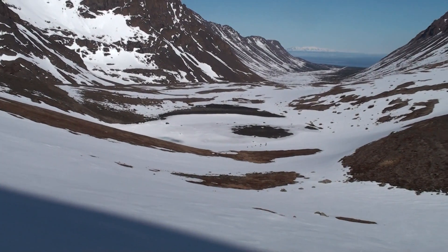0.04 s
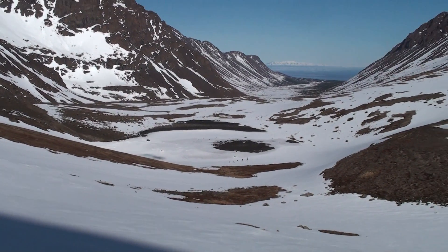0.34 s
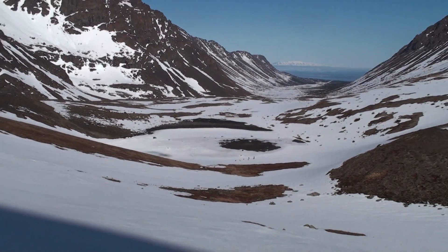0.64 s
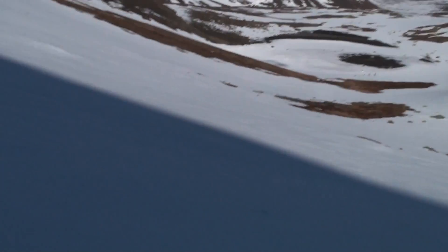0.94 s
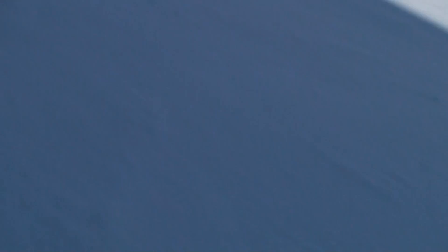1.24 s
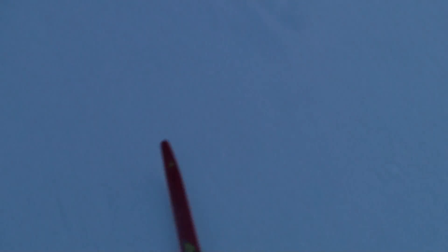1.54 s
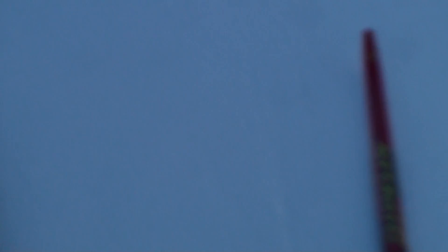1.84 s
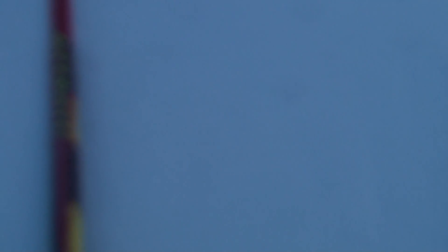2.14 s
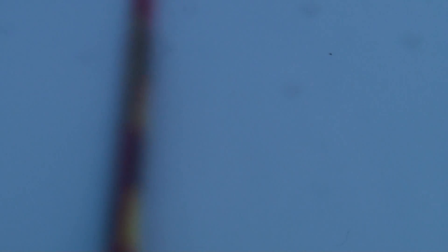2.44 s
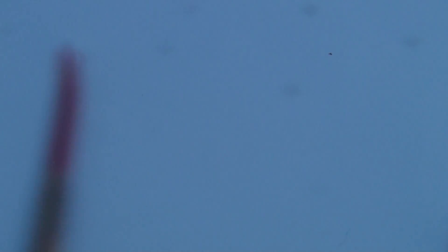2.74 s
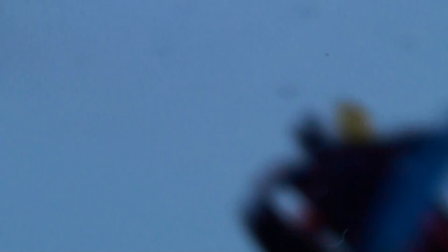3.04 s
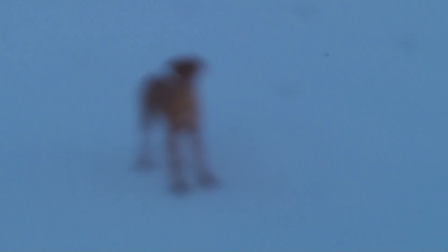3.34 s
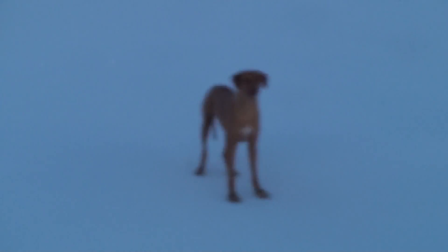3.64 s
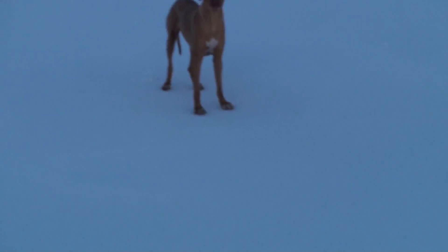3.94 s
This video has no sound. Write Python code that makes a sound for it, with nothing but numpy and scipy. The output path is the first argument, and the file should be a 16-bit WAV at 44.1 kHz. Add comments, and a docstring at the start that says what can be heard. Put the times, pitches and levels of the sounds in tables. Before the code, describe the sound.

Skis scrape and crunch on crusty snow, close by in open air with faint hiss. For the first 2 seconds, low wind buffets the microphone, fading as poles and bindings click. From 2.4 seconds a gritty scrape builds, peaking near 2.9, with sharp cracks, small knocks and a tiny squeak. A pole ticks at 3.5 seconds, then a second crunching stroke swells until about 4 seconds.

```python
"""A skier shuffles on crusty snow in open air, close to a hand-held camera: no echo, only a faint hiss.
For two seconds wind buffets the microphone ports; as it drops, pole and binding click.
From 2.4 s a ski scrapes up dense ice grains; the crust snaps in short cracks and gives way in longer
crunches, while the skis knock and packed snow squeaks. A pole ticks at 3.5 s,
and a second stroke builds through the last half second."""
import sys
import numpy as np
from scipy import signal
from scipy.fft import rfft, irfft, next_fast_len
from scipy.io import wavfile
from scipy.ndimage import uniform_filter1d, map_coordinates

SR = 44100
rng = np.random.default_rng(int(sys.argv[2]) if len(sys.argv) > 2 else 0)


def file_out(sig):
    """Save sig as 16-bit WAV at sys.argv[1]."""
    # one column per channel
    cols = np.atleast_2d(sig).T
    # limit, then scale
    lim = np.clip(cols, -1, 1)
    pcm = np.round(lim * 32767).astype(np.int16)
    wavfile.write(sys.argv[1], SR, pcm)


N = 176400


def amp(db):
    """Decibels to gain."""
    return 10 ** (np.asarray(db) / 20)


def unit(x):
    """Scale to rms 1."""
    return x / np.sqrt(np.mean(x ** 2) + 1e-20)


def along(points, hz):
    """Read (Hz, value) points along a log frequency axis."""
    freqs, values = np.transpose(points)
    return np.interp(np.log(hz + 1), np.log(freqs + 1), values)


def curves(rows):
    """A dB value per sample for each column after the time; silent outside."""
    times, *columns = np.transpose(rows)
    return [np.interp(np.arange(N) / SR, times, db, left=-120, right=-120) for db in columns]


def wobble(rate, size=N):
    """A smooth random curve, rate knots a second."""
    knots = rng.standard_normal(size // 16 + 8)
    return map_coordinates(knots, [np.arange(size) * rate / SR], mode="mirror")


def swell(start, length):
    """A rounded rise and fall, timed in seconds."""
    progress = np.clip((np.arange(N) / SR - start) / length, 0, 1)
    return np.sqrt(abs(np.sin(np.pi * progress)))


def coloured(x, gain_db, size=8192):
    """x through a minimum-phase filter whose gain in dB is a function of frequency."""
    cepstrum = irfft(np.log(amp(gain_db(np.fft.rfftfreq(size, 1 / SR)))))
    cepstrum[1:size // 2] *= 2
    cepstrum[size // 2 + 1:] = 0
    kernel = irfft(np.exp(rfft(cepstrum)))[:size // 2]
    padded = next_fast_len(x.shape[-1] + size // 2, True)
    return irfft(rfft(x, padded) * rfft(kernel, padded), padded)[..., :x.shape[-1]]


def rush(spectrum, alike):
    """Left and right noise of rms 1 with a given spectrum and likeness."""
    def noise(sign):
        likeness = lambda hz: np.clip(along(alike, hz), -.99, .99)
        gain_db = lambda hz: along(spectrum, hz) + 10 * np.log10(1 + sign * likeness(hz))
        return coloured(rng.standard_normal(N), gain_db)

    mid, side = noise(1), noise(-1)
    return unit(np.array([mid + side, mid - side]))


def add(track, start, sound):
    """Mix a sound in at start seconds."""
    part = track[:, round(start * SR):][:, :sound.shape[1]]
    part += sound[:, :part.shape[1]]


# Open air all around the microphone. Each row: frequency in Hz, relative level in dB.
AIR_SPECTRUM = [(25, 12), (70, 8.5), (125, 3), (220, -4), (500, 0.5), (1000, -2), (2000, -5.5),
                (4000, -12.5), (7000, -16), (10000, -18.5), (12500, -16.5), (16000, -21.5)]
# Its stereo image. Each row: frequency in Hz, left-right correlation.
AIR_ALIKE = [(60, 0.96), (400, 0.52), (1400, 0.096), (3100, 0.065), (7000, 0.33), (10500, 0.57), (12000, 1)]
AIR_DB = -57.5


def air():
    """The faint, steady hiss of still air."""
    return amp(AIR_DB) * rush(AIR_SPECTRUM, AIR_ALIKE)


def hollow_tone(centre_hz=507, width_hz=68, db=-61.5):
    """A faint, narrow band of noise swells and fades as the wind drops."""
    band = coloured(rng.standard_normal(N), lambda hz: -20 * np.log10(1 + ((hz - centre_hz) / width_hz) ** 2))
    return amp(db) * swell(start=2.095, length=0.51) * unit(band)


# Wind right on the microphone. Each row: time in seconds, buffet and flutter levels in dB before trim.
GUSTS = [(0.0, -39.5, -57.5), (0.09, -42.5, -48.5), (0.31, -42, -59.5), (0.37, -51, -74),
         (0.47, -40, -53.5), (0.68, -40, -46.5), (0.75, -43, -52), (0.79, -38, -41.5), (1.13, -41.5, -46.5),
         (1.3, -36, -38), (1.41, -37.5, -32), (1.46, -37.5, -39), (1.53, -44, -41.5), (1.6, -35, -32.5),
         (1.64, -45, -37), (1.67, -32, -29.5), (1.72, -48, -44.5), (1.78, -36, -41.5), (1.82, -53, -44),
         (1.88, -55, -74), (1.95, -57.5, -52.5), (1.98, -57, -88), (2.1, -68, -88)]
# Its three layers, low to high. Each row: frequency in Hz, relative level in dB.
BUFFET_SPECTRUM = [(20, -10), (45, -5), (75, -2), (120, -4.5), (200, -22), (400, -45), (1200, -60),
                   (4000, -100)]
FLUTTER_SPECTRUM = [(30, -24), (100, -7), (170, -0.5), (250, -7), (380, -15), (600, -24.5), (1000, -50.5),
                    (3000, -77)]
WHIRL_SPECTRUM = [(100, -22), (300, -1.5), (520, -1.5), (750, -4.5), (1200, -19), (3000, -48)]
# Wind across the two ports. Each row: frequency in Hz, left-right correlation.
WIND_ALIKE = [(40, 0.61), (70, 0.92), (130, 0.22), (290, -0.17), (1000, -0.55)]
# Eddies hitting the ports. Each row: centre in seconds, width in seconds, pitch in Hz, level in dB.
THUMPS = [(0.643, 0.009, 101, -32.5), (0.957, 0.0068, 286, -38.5), (1.338, 0.0038, 224, -28),
          (1.417, 0.0041, 194, -26), (1.661, 0.0074, 104, -22.5)]
BUFFET_TRIM_DB, FLUTTER_TRIM_DB, BUFFET_LEFT_DB = 2.5, 1.5, 0.6
STRONG_GUST_DB, WHIRL_DB, WHIRL_GROWTH = -37.5, -55.5, 2.3  # growth: dB of whirl per dB of flutter


def wind():
    """Wind buffets and flutters on the ports; strong gusts add a higher whirl and single eddies thump."""
    buffet_db, flutter_db = curves(GUSTS)
    whirl_db = WHIRL_DB + WHIRL_GROWTH * (flutter_db - STRONG_GUST_DB)
    thumps, t = np.zeros((2, N)), np.arange(N) / SR
    for centre, width, hz, db in THUMPS:
        envelope = amp(db) * np.exp(-.5 * ((t - centre) / width) ** 2)
        port_phase = rng.normal(0, 0.54, (2, 1))
        thumps += envelope * np.sin(2 * np.pi * hz * (t - centre) + port_phase)
    buffet = amp(buffet_db + BUFFET_TRIM_DB + wobble(15.77)) * rush(BUFFET_SPECTRUM, WIND_ALIKE)
    flutter = amp(flutter_db + FLUTTER_TRIM_DB + 2.34 * wobble(50)) * rush(FLUTTER_SPECTRUM, WIND_ALIKE)
    whirl = amp(whirl_db + 3.5 * wobble(76)) * rush(WHIRL_SPECTRUM, WIND_ALIKE)
    return buffet * amp([[BUFFET_LEFT_DB], [-BUFFET_LEFT_DB]]) + flutter + whirl + thumps


GRAINS_PER_S, GRAIN_SPREAD_DB, CLUMPS_PER_S = 6500, 5.5, 290
PLATE_WIDTH_HZ, PLATE_LIFE_S, PLATE_SPREAD_DB = 200, 0.03, 1.92


def grains(size):
    """Ice grains break at random moments with log-normal sizes: mid and side impulses."""
    breaks = rng.random(size) < GRAINS_PER_S / SR
    sizes = amp(GRAIN_SPREAD_DB * np.clip(rng.standard_normal(size), -2, 2))
    return unit(breaks * sizes * rng.choice([-1, 1], (2, size)))


def burst(envelope, gain_db):
    """A cluster of grains with the chance resonances of one plate and the energy of its envelope."""
    resonances = rng.standard_normal(256)
    plate_db = lambda hz: PLATE_SPREAD_DB * map_coordinates(resonances, [hz / PLATE_WIDTH_HZ], mode="mirror")
    cluster = coloured(grains(len(envelope)) * envelope, lambda hz: gain_db(hz) + plate_db(hz))
    return unit(cluster) * np.sqrt(np.mean(envelope ** 2))


# Snow pressed underfoot. Each row: frequency in Hz, relative level in dB.
PUSH_SPECTRUM = [(40, -29), (120, 2), (380, -0.5), (900, -16)]


def push(db=-51):
    """Snow rumbles briefly under the hardest push."""
    rumble = unit(coloured(grains(N), lambda hz: along(PUSH_SPECTRUM, hz)))
    return amp(db) * swell(start=2.857, length=0.057) * rumble


# Packed snow close by. Each row: start in seconds, length in seconds, pitch in Hz, level in dB.
SQUEAKS = [(2.784, 0.0084, 1659, -29), (3.279, 0.023, 810, -47.5), (3.527, 0.022, 1575, -29.5)]


def squeaks():
    """Packed snow sticks and slips in brief, unsteady tones."""
    wavering_t = np.cumsum(1 + 0.1 * wobble(200)) / SR
    return sum(amp(db) * swell(start, length) * np.sin(2 * np.pi * hz * wavering_t)
               for start, length, hz, db in SQUEAKS)


# Gear near the microphone. Each row: start in seconds, level in dB, tilt in dB per octave.
CLICKS = [(1.958, -40.5, 0), (2.0704, -38.5, 0), (2.0951, -26.5, -1), (2.0975, -34, -2), (2.124, -39, -1),
          (2.147, -38.5, -1), (2.21, -32.5, -2), (2.2241, -32, 4)]
# A click before its tilt. Each row: frequency in Hz, relative level in dB.
CLICK_SPECTRUM = [(200, -19.5), (2000, -3.5), (5600, 3), (9500, -17), (12000, -9.5), (16000, -30)]


def clicks(t60_s=0.0039, tail_db=-18, tail_t60_s=0.035):
    """Pole and binding make hard, bright contacts that die at once and leave a faint rattle."""
    track, t = np.zeros((2, N)), np.arange(SR // 20) / SR
    envelope = amp(-60 * t / t60_s) + amp(tail_db - 60 * t / tail_t60_s)
    for start, db, tilt_db in CLICKS:
        click = burst(envelope, lambda hz: along(CLICK_SPECTRUM, hz) + tilt_db * np.log2(hz + 1))
        add(track, start, amp(db) * click)
    return track


# A pole striking close by. Each row: start in seconds, gain in dB.
POLE_CONTACTS = [(3.5035, -21.5), (3.505, -20), (3.5099, -40)]
# Its ring. Each row: frequency in Hz, relative level in dB, seconds to fall 60 dB.
POLE_MODES = [(2680, -21.5, 0.041), (3940, -3.5, 0.0091), (4500, 2, 0.0052), (4970, 2, 0.0055),
              (6300, -3.5, 0.0067), (7300, -2.5, 0.0039), (11300, -20, 0.0046)]


def pole_tick():
    """A hard contact and two quick rebounds ring a few heavily damped modes."""
    track, t = np.zeros((2, N)), np.arange(SR // 20) / SR
    for start, db in POLE_CONTACTS:
        ring = sum(rng.choice([-1, 1], (2, 1)) * amp(mode_db - 60 * t / t60) * np.sin(2 * np.pi * hz * t)
                   for hz, mode_db, t60 in POLE_MODES)
        add(track, start, amp(db) * ring)
    return track


# Skis knocking below the microphone. Each row: start in seconds, pitch in Hz, level in dB.
KNOCKS = [(2.195, 650, -42), (2.787, 298, -35), (2.808, 465, -29), (2.89, 383, -28), (2.964, 420, -36.5),
          (3.186, 433, -36), (3.309, 370, -32), (3.518, 257, -33), (3.97, 457, -27)]


def knocks(attack_s=0.00061, t60_s=0.022):
    """Weight rocks a ski and it rings hollowly for a few cycles, damped by the snow."""
    track, t = np.zeros((2, N)), np.arange(SR // 10) / SR
    for start, hz, db in KNOCKS:
        envelope = (1 - np.exp(-t / attack_s)) * amp(db - 60 * t / t60_s)
        add(track, start, np.tile(envelope * np.sin(2 * np.pi * hz * t), (2, 1)))
    return track


# Crust giving way underfoot.
# Each row: start in seconds, hold in seconds, level in dB, tilt in dB per octave.
CRUNCHES = [(2.854, 0.039, -27.5, 1.5), (2.89, 0.014, -35.5, -2.5), (3.403, 0.0079, -36.5, -1.8),
            (3.487, 0.011, -41, -1), (3.518, 0.032, -32.5, 0), (3.638, 0.01, -42, -0.5),
            (3.664, 0.0093, -35, -2.1), (3.697, 0.016, -37, 0), (3.745, 0.018, -40.5, 1),
            (3.815, 0.0056, -27, 0.5), (3.964, 0.0092, -32.5, -3.5)]
# A crunch before its tilt. Each row: frequency in Hz, relative level in dB.
CRUNCH_SPECTRUM = [(50, -22), (130, -15), (280, -1.5), (750, -0.5), (1050, 0), (1550, 1), (2500, -1),
                   (4000, -6), (6000, -9.5), (8300, -15), (10000, -23), (11800, -18), (16000, -34)]


def crunches(attack_s=0.002, t60_s=0.032, clump_db=4.5):
    """Snow packs under a ski or pole: a run of grains, longer and duller than a crack."""
    track, t = np.zeros((2, N)), np.arange(SR // 10) / SR
    for start, hold, db, tilt_db in CRUNCHES:
        envelope = np.minimum(t / attack_s, 1) * amp(-60 * np.maximum(t - hold, 0) / t60_s)
        clumps = amp(clump_db * wobble(CLUMPS_PER_S, size=len(t)))
        clumps /= np.sqrt(np.average(clumps ** 2, weights=envelope ** 2))
        tone_db = lambda hz: along(CRUNCH_SPECTRUM, hz) + tilt_db * np.log2(hz + 1)
        add(track, start, amp(db) * burst(envelope * clumps, tone_db))
    return track


# Crust snapping at close range. Each row: start in seconds, level in dB before trim,
# relative bass, middle and treble in dB, hold in seconds.
CRACKS = [(2.492, -26, -40, -14, -10, 0.0029), (2.569, -19, -17.5, -6.5, -6.5, 0.0043),
          (2.681, -9, -25.5, -10, -13, 0.0034), (2.708, -22.5, -34, -12, -4, 0.0036),
          (2.739, -17.5, -41, -8, -9.5, 0.0046), (2.77, -16, -29, -6, -4, 0.0017),
          (2.784, -14, -24, 1, -14, 0.0035), (2.793, -17, -25, -16, -14, 0.0021),
          (2.811, -14.5, -27, -18, -10, 0.0019), (2.823, -22.5, -30, -10, -11, 0.0026),
          (2.843, -17, -28, -7, -8, 0.0018), (2.935, -16, -28, -14, -6.5, 0.0027),
          (2.953, -22, -35, -8, -9, 0.001), (2.966, -21.5, -20, -19, 1, 0.0013),
          (2.973, -15, -22, -3.5, -8.5, 0.0037), (2.998, -17, -33, -11, -11, 0.0015),
          (3.009, -15, -31, -15, -8.5, 0.0026), (3.039, -30, -54, -17, -11, 0.0021),
          (3.108, -19.5, -30, -4.5, -11.5, 0.0023), (3.158, -33.5, -15, -5, -9.5, 0.0022),
          (3.184, -26, -18, -17, -20, 0.0022), (3.196, -31, -23, 1, -7, 0.0023),
          (3.21, -24.5, -29.5, -13, -19, 0.0048), (3.305, -21, -26, -5.5, -17, 0.002),
          (3.31, -24.5, -22, -11, -13, 0.002), (3.39, -38, -29, -3, -9, 0.0016),
          (3.856, -19, -30, -14, -8, 0.0022), (3.863, -25, -34, -10, 7, .002),
          (3.99, -15, -21, -20, -12, 0.00072)]
# The centres of bass, middle and treble in Hz.
BAND_HZ = [470, 1470, 5200]
# The tone all cracks share. Each row: frequency in Hz, relative level in dB.
CRACK_SPECTRUM = [(50, -43), (150, -1.5), (300, 9), (700, 7), (1100, 0.5), (1600, 0.5), (2400, 0),
                  (3100, 0), (4000, -3.5), (5500, 0), (7000, -5), (8300, -12.5), (10000, -19),
                  (11800, -14.5), (14000, -28), (16000, -36)]


def cracks(trim_db=-13, t60_s=0.013, tail_db=-12.5, tail_t60_s=0.049):
    """Each snap is a few milliseconds of fractures with an instant start and a weak crumbling tail."""
    track, t = np.zeros((2, N)), np.arange(SR // 10) / SR
    for start, db, *bands_db, hold in CRACKS:
        snap = amp(-60 * np.maximum(t - hold, 0) / t60_s)
        tail = amp(tail_db - 60 * t / tail_t60_s)
        tone = list(zip(BAND_HZ, bands_db))
        crack = burst(snap + tail, lambda hz: along(CRACK_SPECTRUM, hz) + along(tone, hz))
        add(track, start, amp(db + trim_db) * crack)
    return track


def sticking(length_s=0.013, dip_db=-1.5):
    """Gain on the scrape: it dips as the ski sticks just before each snap."""
    stuck = np.max([swell(start - length_s, length_s) for start, *_ in CRACKS], axis=0)
    return amp(dip_db * stuck)


def crumbs(per_s=49, jump_db=12.5, t60_s=0.014):
    """Gain on the grains: it jumps when a bigger crumb breaks and falls back within milliseconds."""
    breaks = (rng.random(N) < per_s / SR) * amp(jump_db)
    decay = float(amp(-60 / SR / t60_s))
    return 1 + signal.lfilter([1], [1, -decay], breaks)


def plates(x):
    """Breaking plates of crust ring briefly at chance pitches: patches of gain in pitch and time."""
    hz, t, spectra = signal.stft(x, SR, nperseg=512)
    grid = np.meshgrid(hz / PLATE_WIDTH_HZ, t / PLATE_LIFE_S, indexing="ij")
    patches = map_coordinates(rng.standard_normal(spectra.shape[1:]), grid, mode="mirror")
    return signal.istft(spectra * amp(PLATE_SPREAD_DB * patches), SR, nperseg=512)[1][:, :N]


# Skis sliding faintly over loose snow. Each row: time in seconds, level in dB.
SLIDE = [(0, -72.5), (1.05, -72), (1.14, -58.5), (1.19, -66), (1.46, -67.5), (1.52, -60), (1.63, -67.5),
         (1.78, -65), (1.9, -62.5), (2.12, -65), (2.3, -68.5), (3.05, -65.5), (3.2, -52.5), (3.35, -70),
         (4, -58)]
# Two strokes just below the microphone, a list for each.
# Each row: time in seconds, level of the treble grit in dB, level of the midrange rasp in dB.
STROKES = [
    [(2.38, -69, -73), (2.44, -58.5, -62), (2.55, -49.5, -64), (2.58, -44, -52.5), (2.7, -43.5, -51),
     (2.78, -38.5, -47), (2.85, -34.5, -38.5), (2.877, -23, -24), (2.915, -36.5, -45), (3.0, -42.5, -50),
     (3.03, -55, -58), (3.07, -76, -89)],
    [(3.575, -62, -60), (3.592, -54, -49.5), (3.64, -55, -50), (3.73, -52.5, -44.5), (3.79, -46, -41.5),
     (3.84, -35, -32), (3.89, -42.5, -38), (3.92, -28, -29.5), (3.948, -24, -29.5), (3.971, -23.5, -34),
     (3.979, -40, -39), (4.0, -60, -41)],
]
# Loose snow, grit (a list for each stroke) and rasp. Each row: frequency in Hz, relative level in dB.
POWDER_SPECTRUM = [(100, -41), (600, -3), (2000, 0), (4000, -0.5), (6800, 0), (9500, -12), (16000, -13.5)]
GRIT_SPECTRA = [
    [(100, -44), (1000, -16), (2000, -6.5), (3000, 1.5), (4200, 0), (5500, 0.5), (7000, -1), (8300, -9.5),
     (10000, -18), (11800, -12), (14000, -21), (16000, -27)],
    [(100, -46), (1000, -27), (3000, -3), (4200, 0.5), (5300, 4), (6000, 1.5), (6700, -4), (8000, -7.5),
     (10000, -19), (11800, -16), (16000, -40)],
]
RASP_SPECTRUM = [(50, -58), (150, -29), (330, -8), (700, -9), (1100, -7.5), (1600, 0), (2100, -1.5),
                 (3000, -7.5), (5000, -35), (10000, -22), (16000, -34)]
CRUMB_LIMIT_DB = -44  # in a scrape louder than this the crumbs grow no bigger


def scrapes():
    """Ski edges catch and let go, breaking grains in clumps: grit over a rasp, a soft slide beneath."""
    catch = np.clip(wobble(CLUMPS_PER_S), -2, 2)
    crumb_gain = crumbs()

    def layer(level_db, spectrum, clump_db, crumbly=1):
        """Grains at a given level; crumbs stand out less the harder the ski scrapes."""
        prominence = crumbly * amp(np.minimum(CRUMB_LIMIT_DB - level_db, 0))
        sizes = amp(clump_db * catch) * (1 + prominence * crumb_gain)
        sizes /= np.sqrt(uniform_filter1d(sizes ** 2, size=SR // 8))  # even power over 1/8 s
        return amp(level_db) * unit(coloured(grains(N) * sizes, lambda hz: along(spectrum, hz)))

    track = layer(curves(SLIDE)[0], POWDER_SPECTRUM, clump_db=2, crumbly=0.46)
    for stroke, grit_spectrum in zip(STROKES, GRIT_SPECTRA):
        grit_db, rasp_db = curves(stroke)
        track += layer(grit_db, grit_spectrum, clump_db=3.5)
        track += layer(rasp_db, RASP_SPECTRUM, clump_db=2.5)
    return plates(track) * sticking()


# The skier's stereo width at the microphone. Each row: frequency in Hz, gain of the side signal in dB.
SKIER_WIDTH = [(100, -57), (450, -35.5), (1200, -15.5), (5500, -14), (7500, -15.5), (9500, -1.5),
               (11000, -2), (12000, -19), (16000, -27)]
SKIER_LEFT_DB = 0.46


def scene():
    """Snow and gear sound just below the camera, slightly left, in wind and still-air hiss."""
    mid, side = scrapes() + push() + cracks() + crunches() + knocks() + clicks() + pole_tick() + squeaks()
    side = coloured(side, lambda hz: along(SKIER_WIDTH, hz))
    skier = np.array([mid + side, mid - side]) * amp([[SKIER_LEFT_DB], [-SKIER_LEFT_DB]])
    return skier + wind() + hollow_tone() + air()


BAND_LIMIT_HZ = 16600


def record(dry):
    """The hand-held camera keeps nothing above its band limit."""
    padded = next_fast_len(N + SR // 2)
    passband = np.fft.rfftfreq(padded, 1 / SR) < BAND_LIMIT_HZ
    return irfft(rfft(dry, padded) * passband, padded)[:, :N]


dry = scene()
out = record(dry)
file_out(out)
```